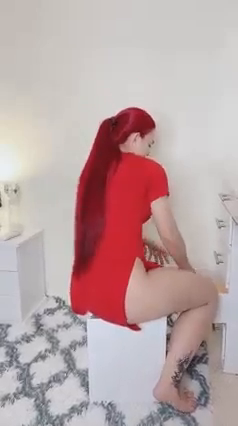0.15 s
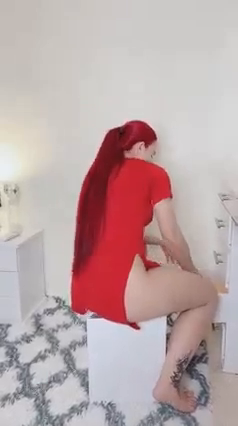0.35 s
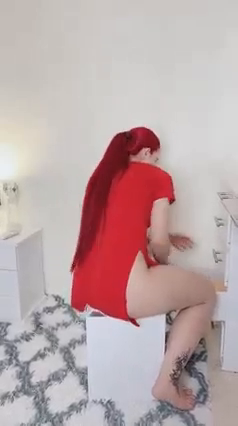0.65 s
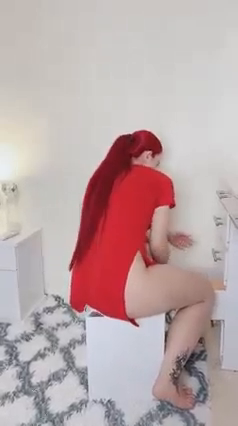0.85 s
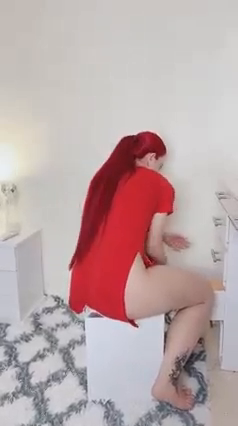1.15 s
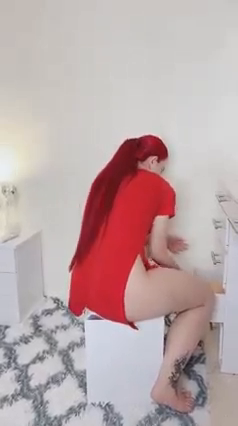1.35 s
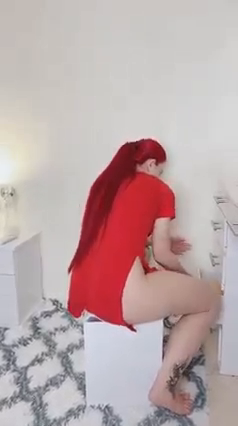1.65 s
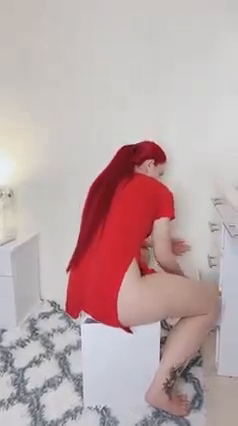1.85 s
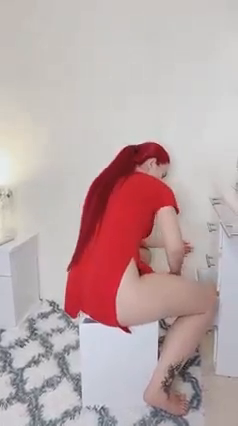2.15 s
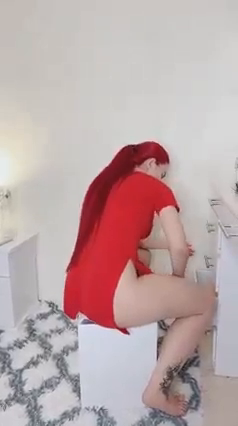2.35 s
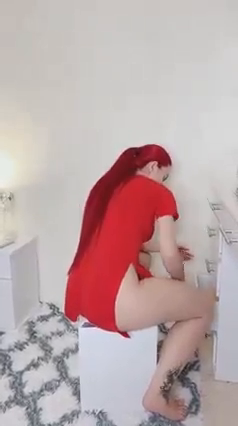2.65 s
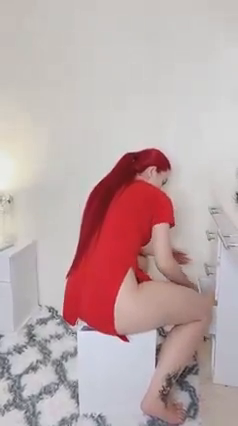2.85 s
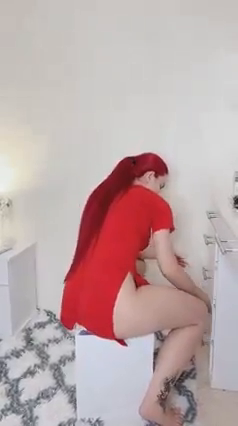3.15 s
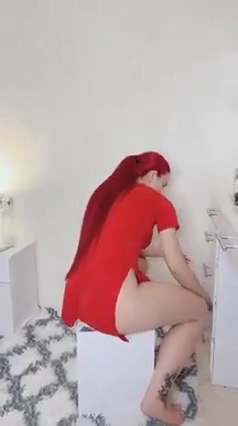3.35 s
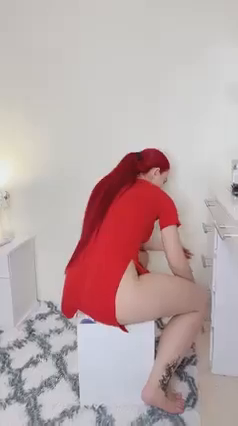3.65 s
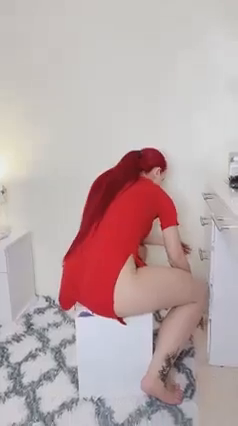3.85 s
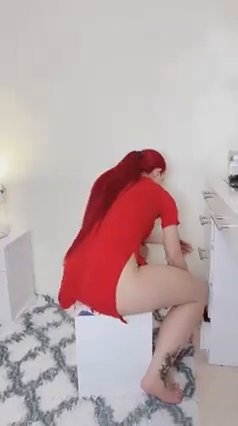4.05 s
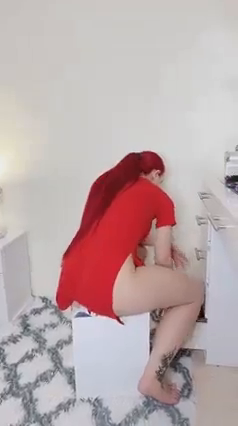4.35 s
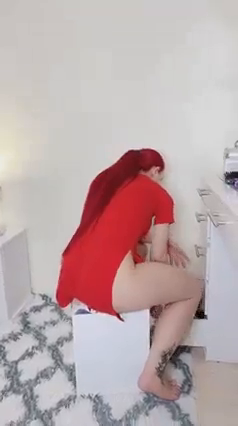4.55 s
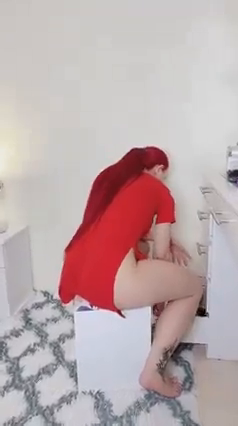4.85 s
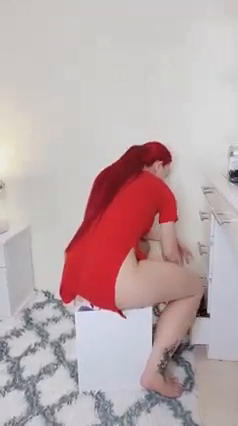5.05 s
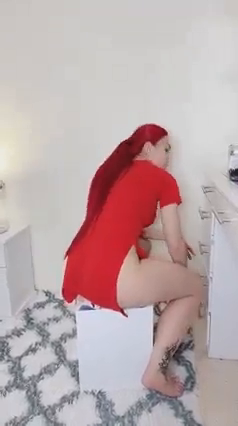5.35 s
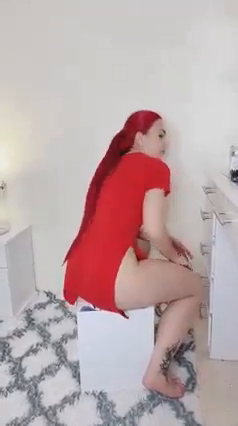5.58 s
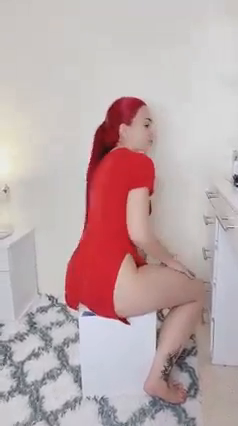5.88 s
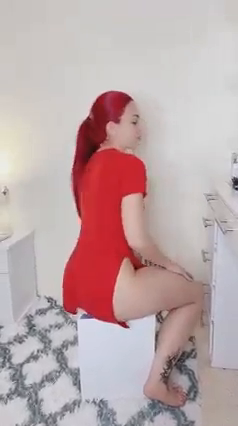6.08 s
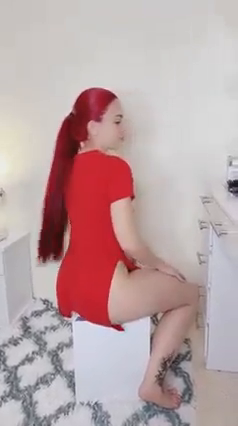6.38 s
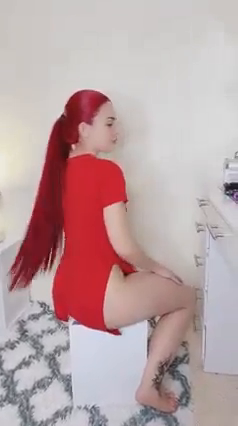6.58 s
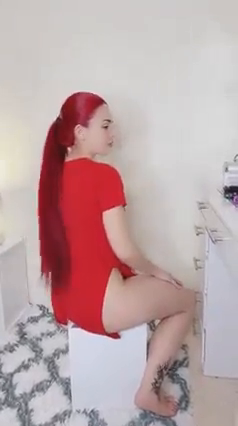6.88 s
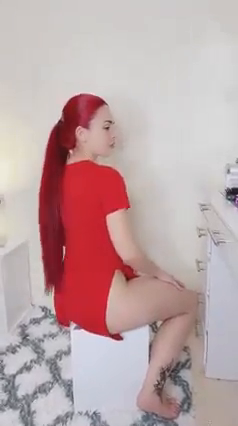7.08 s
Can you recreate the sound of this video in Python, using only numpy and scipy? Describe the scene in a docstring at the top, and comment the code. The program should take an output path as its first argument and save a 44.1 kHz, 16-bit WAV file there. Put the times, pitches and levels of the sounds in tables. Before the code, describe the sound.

In a quiet, small bedroom, a chipboard dresser's drawers are worked by hand. Light knocks and a rumble lead to a heavy, boomy bang, then more clunks. After a pause come further groups of double and triple knocks with short runner hiss, ending in a sharp, loud slam and a few small clicks. Faint hum and rustling clothes fill the gaps. The microphone is a little way off, in stereo.

```python
"""Drawers of a chipboard dresser knock as they are pulled out and pushed shut in a quiet bedroom.
Each knock sums decaying carcass and drawer-box modes with bands of decaying noise for the panels and the
room's brief answer, and rebounds twice; harder knocks ring longer, and loose parts ring as buzzing tones.
Filtered noise makes the runners hiss and the drawers rumble; stick-slip pulses creak, gliding tones squeak.
Clothes rustle over still air, a faint hum and a thin whine."""
import sys
import numpy as np
from scipy import signal
from scipy.fft import rfft, irfft, next_fast_len
from scipy.io import wavfile

SR = 44100
rng = np.random.default_rng(int(sys.argv[2]) if len(sys.argv) > 2 else 0)


def int16_out(signal):
    """Quantize to a 16-bit WAV file."""
    q = np.round(np.clip(np.atleast_2d(signal).T, -1, 1) * 32767)
    wavfile.write(sys.argv[1], SR, q.astype(np.int16))


N = 318327

# Stereo coherence of the sources. Each row: frequency in Hz, left-right likeness (1 is identical).
LIKENESS = [(160, 1), (220, 1), (370, 0.99), (700, 0.55), (1050, 0.38), (1700, 1), (2800, 0.46),
            (4400, 0.48), (7000, 0.41), (10000, 0.97)]


def gain_of(db):
    """Amplitude is ten to the power of the level in decibels over twenty."""
    return 10 ** (np.asarray(db) / 20)


def evened(x):
    """Dividing by the root mean square gives a signal unit power."""
    return x / np.sqrt(np.mean(x ** 2) + 1e-20)


def read(points, hz):
    """Spectra are interpolated along a logarithmic frequency axis, near to how pitch is heard."""
    f, value = np.transpose(points)
    return np.interp(np.log(hz + 1), np.log(f + 1), value)


def add(mix, s, sound):
    """Superposition: a sound starting at s seconds adds to the mix."""
    part = mix[:, round(s * SR):][:, :sound.shape[-1]]
    part += sound[..., :part.shape[1]]


def ports(pair, hz, likeness=LIKENESS):
    """Coherence: two unrelated signals, weighted as mid and side, give left and right of set likeness."""
    same = np.clip(read(likeness, hz), -1, 1)
    mid = pair[0] * np.sqrt((1 + same) / 2)
    side = pair[1] * np.sqrt((1 - same) / 2)
    return np.array([mid + side, mid - side])


def noise(spectrum, grain_db=0, likeness=LIKENESS):
    """Friction as countless tiny impacts: white noise of uneven grain, coloured by a spectrum, at unit rms."""
    size = next_fast_len(N, True)
    hz = np.fft.rfftfreq(size, 1 / SR)
    white = rng.standard_normal((2, size))
    grain = np.repeat(rng.standard_normal(size // 32 + 1), 32)[:size]
    impacts = rfft(white * gain_of(grain_db * grain))
    coloured = ports(impacts, hz, likeness) * gain_of(read(spectrum, hz))
    return evened(irfft(coloured, size)[:, :N])


def knocks(count=2):
    """Impact and restitution: drawers strike stops, fronts and rails, and rebound at shrinking gaps."""
    # Each row: start in seconds, carcass thud, large panels, small panels and clack in dB (trimmed in blow),
    # treble slope in dB per octave, rebound level in dB relative to the blow,
    # ring time factor (under 1 where a hand damps the wood).
    blows = [(0.442, -43, -38, -38.5, -56, -0.5, -9, 1), (0.47, -54, -34, -32, -41, -20, 3, 1),
             (0.482, -55, -42, -38, -50, -4.5, -12, .8), (0.509, -52, -30, -31, -42, -6, -11, .9),
             (0.573, -42, -31, -32, -43.5, -11, -14, 1), (0.614, -48, -40, -40, -49, -10, -14, .8),
             (0.896, -49.5, -55, -54, -58, 4.5, -5, 1), (1.025, -50, -38, -40, -52.5, -5, -2.5, 1),
             (1.073, -32.5, -39, -43, -46.5, -6, -11, 1), (1.141, -27, -25.5, -31, -47.5, -5.5, -23, .9),
             (1.175, -36, -39, -40, -41.5, -8, -16, .7), (1.202, -36, -34, -37, -48, -6, -8, .9),
             (1.327, -38, -24, -21.5, -39, -7.5, -17, 1), (1.344, -40, -23, -18, -34.5, -6.5, -13, 1),
             (1.36, -11.5, -18, -15.5, -27, -1.5, -8, .9), (1.54, -31, -25, -22.5, -33, -3, -16, 1),
             (1.563, -37, -25, -24, -31.5, -7.5, -9, 1), (1.593, -38, -23, -23, -38.5, -9, -9.5, .9),
             (1.675, -39, -48, -46, -43, -6.5, -4, 1), (1.826, -50, -60, -60, -65, 0, -8, 1),
             (2.71, -49, -40, -40, -54, -6, -6, 1), (2.741, -31, -22, -21.5, -39, -6.5, -15, 1),
             (2.76, -36, -24, -24, -43, -9.5, -20, .9), (2.779, -42, -32, -32, -45, -10, -18, .8),
             (2.85, -25, -24, -25.5, -35.5, -8.5, -14.5, 1.05), (2.882, -29, -29, -33, -45, -8, -27, 1),
             (3.104, -21, -18, -17.5, -37, -4.2, -18, 1), (3.138, -33, -29, -28, -52, -6, -18, .9),
             (3.189, -43, -44, -44, -54, -6, -9, 1), (3.227, -44, -36, -35, -46.5, -12, -14, .7),
             (3.252, -30.5, -32.5, -31, -43.5, -8, -15, .9), (3.974, -30, -33.5, -33.5, -46, -9, -12, 1),
             (3.983, -39, -32, -31, -41.5, -14, -1, 1), (4.04, -60, -29, -26, -34.5, -9.5, -14, 1),
             (4.053, -27, -26, -24, -31, -8.5, -8, 1), (4.096, -32, -38, -31, -41, -9, -14, 1),
             (4.337, -42, -30, -30, -40.5, -4.5, -10.5, .9), (4.383, -39, -35, -39, -50, -7, -20, .8),
             (4.879, -35, -22.5, -19.5, -32, -9.5, -20, .9), (4.908, -30, -23.5, -24, -43, -7.5, -14, .9),
             (4.942, -52, -33, -31, -41.5, -16, -8, .9), (4.968, -48, -38, -30, -45, -12, -14, 1),
             (5.169, -26, -22.5, -21.5, -39.5, -7, -26, 1), (5.198, -17.5, -11.5, -10, -18, -2.7, -8, 1.03),
             (5.229, -30, -30, -29, -29, -3.5, -9, 1.1), (5.494, -36, -30, -29, -38, -6, -13, .8),
             (5.512, -31, -33.5, -32, -50, -4, -14.5, .45), (5.543, -50, -35, -31, -53, -8, -26, .5)]
    first_gap_s, gap_shrink, gap_scatter, loss_db = .03, .85, .12, -7.5  # loss from one rebound to the next
    hard_db, ring_gain_per_db, rebound_ring = -15.5, .011, 0.32  # blows below hard_db ring for less time
    glance_thud_db, glance_clack_db, glance_slope_db = -12, -4.5, -2  # rebounds lack bass and treble

    out = np.zeros((2, N))
    scatter = np.exp(gap_scatter * rng.uniform(-1, 1, (len(blows), count)))
    gaps = first_gap_s * gap_shrink ** np.arange(count) * scatter
    for row, delays in zip(blows, np.cumsum(gaps, axis=1)):
        s, low_db, large_db, panel_db, clack_db, slope_db, rebound_db, freedom = row
        ring = freedom * np.exp(ring_gain_per_db * (max(low_db, panel_db) - hard_db))
        add(out, s, blow(low_db, large_db, panel_db, clack_db, slope_db, ring, size=20480))
        glance = blow(low_db + glance_thud_db, large_db, panel_db, clack_db + glance_clack_db,
                      slope_db + glance_slope_db, ring * rebound_ring, size=8192)
        for k, delay in enumerate(delays):
            add(out, s + delay, gain_of(rebound_db + k * loss_db) * glance)
    return out


def blow(low_db, large_db, panel_db, clack_db, slope_db, ring, size, thud_db=-1, clatter_db=-1, box_db=-2):
    """Modal excitation: the spectrum of one contact sets how strongly panels and box ring above the thud."""
    t = np.arange(size) / SR
    treble_hz, octaves = 1050, 2.5  # the treble slopes from here, over this span
    treble_db = clack_db + slope_db * octaves
    force = [(190, large_db), (373, panel_db), (650, clack_db), (treble_hz, clack_db),
             (treble_hz * 2 ** octaves, treble_db)]  # (Hz, dB)
    boom = gain_of(low_db + thud_db) * thud(ring, t)
    rattle = gain_of(clatter_db) * clatter(force, ring, t)
    box = gain_of(box_db) * drawer_box(force, ring, t)
    release = np.minimum(np.linspace(10, 0, size), 1)  # fades the last tenth
    return release * (boom + rattle + box)


def thud(ring, t, rise=.011, seconds=0.027):
    """Low-frequency resonance: the carcass modes swell as the blow spreads, then decay exponentially."""
    # Low modes of the carcass. Each row: frequency in Hz, level in dB, 60 dB decay time in s before ring.
    carcass = [(58, -20, 0.35), (102.86, -1, 0.45), (97.6, -19, 0.49), (139.5, -5.5, 0.23),
               (204.35, -7, 0.55), (306.2, -16.5, .3)]
    detune = 1 + 0.0044 * rng.standard_normal()
    modes = sum(gain_of(db - 60 * t / (t60 * ring)) * np.sin(2 * np.pi * hz * detune * t)
                for hz, db, t60 in carcass)
    boom = modes * (1 - np.exp(-(t / rise) ** 2))
    return boom / np.sqrt(np.mean(boom[t < seconds] ** 2))  # unit rms over the attack


def clatter(force, ring, t, rise_cycles=1.0, touch_s=0.0026, contact=0.66, contact_s=0.016, grain_db=2):
    """High modal density: panel modes merge into noise bands that die into the longer room tail."""
    # Panel bands. Each row: centre in Hz, level in dB, 60 dB decay time in s before ring,
    # room level in dB relative to the band, room 60 dB decay time in s.
    panels = [(137, -10.5, 0.2, -12.5, 0.64), (218, -8, 0.31, -13.5, 0.66), (336, -9.5, 0.25, -6, 0.47),
              (483, -13, 0.12, -1.5, 0.38), (784, -6.5, 0.17, -6.5, 0.43), (1050, -10.5, 0.21, -10, .42),
              (1610, -7, 0.088, -4.5, 0.35), (3178, -4, 0.12, -6.5, 0.34), (4800, -7, 0.14, -8, .36),
              (6200, -2.5, 0.09, -6.5, 0.3), (8000, -10, 0.08, -9, 0.3), (9300, -18, 0.045, -18, 0.13)]
    # Lean of the knocks to one side. Each row: frequency in Hz, left minus right in dB.
    lean = [(190, 0), (340, -1.5), (620, -2.5), (1110, 2.5), (1980, -0.5), (3550, 0.6)]

    hz = np.fft.rfftfreq(len(t), 1 / SR)
    centres = np.array([row[0] for row in panels])
    edges = np.r_[centres[0] / 2, centres, centres[-1] * 1.35]
    chatter = gain_of(grain_db * np.repeat(rng.standard_normal(len(t) // 32), 32))
    taps = ports(rfft(rng.standard_normal((2, len(t))) * chatter), hz)
    taps = taps * gain_of(read(lean, hz) * np.array([[.5], [-.5]]))
    age = np.log(1000) * t  # 60 dB of decay after one t60
    hardness = 1 + contact * np.exp(-t / contact_s)
    out = np.zeros((2, len(t)))
    for (centre, db, t60, room_db, room_t60), lo, hi in zip(panels, edges, edges[2:]):
        wood, room = np.exp(-age / (t60 * ring)), gain_of(room_db) * np.exp(-age / room_t60)
        decay = np.hypot(wood, room)
        swell = 1 - np.exp(-(t / (touch_s + rise_cycles / centre)) ** 2)  # low modes take longer to build
        band = irfft(taps * np.interp(hz, [lo, centre, hi], [0, 1, 0])) * decay * swell * hardness
        attack = band[:, t < .014 + 7 / centre]
        out += gain_of(db + read(force, centre)) * band / np.sqrt(np.mean(attack ** 2))
    return out


def drawer_box(force, ring, t):
    """Discrete resonance: each box mode takes its strength from the blow's spectrum at its own pitch."""
    # Outstanding modes of the box. Each row: frequency in Hz, level in dB, 60 dB decay time in s before ring.
    box_modes = [(339, -13.5, 0.4), (460, -16, 0.099), (592, -9.5, 0.37), (636, -15.5, 0.3),
                 (710, -12.5, 0.17), (948, -21.5, 0.28), (1049, -17.5, 0.14), (1222, -17, 0.36),
                 (1280, -20.5, 0.27), (2130, -16, 0.25), (2490, -23.5, 0.16), (2450, -18, 0.12),
                 (6455, -21.5, .23)]
    # where a blow lands and how far the drawer is out change each mode a little
    scatter_db, detune = 1.5, 0.0058  # greatest change in level, and in pitch as a fraction
    out = np.zeros((2, len(t)))
    for hz, db, t60 in box_modes:
        phases = np.exp(2j * np.pi * rng.random((2, 1)))
        luck, shift = rng.uniform(-1, 1, 2)
        tone = (ports(phases, hz) * np.exp(2j * np.pi * hz * (1 + detune * shift) * t)).imag
        level_db = db + scatter_db * luck + read(force, hz)
        out += np.sqrt(2) * gain_of(level_db - 60 * t / (t60 * ring)) * tone
    return out * (1 - np.exp(-t / 0.0026))


def ringing_parts(width_hz=60, rise_cycles=0.96):
    """Random modulation: loose parts ring and buzz at their joints, which blurs the higher tones most."""
    # Each row: start in seconds, part, level in dB, pitch factor, rattle from 0 to 1.
    rings = [(0.478, "thin panel", -30.5, 1.28, .36), (0.493, "handle", -50.5, 1.12, .4),
             (0.577, "back panel", -30, 1.2, .3), (0.896, "handle", -54.5, 1.05, 0.7),
             (0.9, "thin panel", -54.5, 1.01, .3), (1.2, "dry runner", -43.5, 1.02, 0.7),
             (2.156, "dry runner", -60, .97, .9), (1.362, "handle", -47.5, 1.24, 0.6),
             (1.366, "back panel", -17.5, 1.025, 0.1), (1.356, "thin panel", -24, 1, .5),
             (1.372, "side wall", -22, 1, .1), (1.546, "drawer bottom", -29, .88, 0.6),
             (1.594, "drawer bottom", -32, .92, 0.9), (1.826, "handle pivot", -55.5, 1.01, 0.7),
             (2.754, "back panel", -25, 1.03, 0.2), (2.856, "back panel", -22.5, 1.07, 0.4),
             (3.107, "thin panel", -26.5, 0.95, .36), (3.106, "frame", -34, 0.95, .36),
             (3.116, "back panel", -26, 0.75, 0.2), (4.048, "drawer bottom", -25, 0.98, .36),
             (4.339, "runner stop", -27, 1.036, .45), (4.883, "thin panel", -21.5, 1.01, .36),
             (4.881, "dry runner", -41, .98, .4), (5.215, "side wall", -24, 1, .1),
             (5.203, "frame", -25.5, 1.05, .36), (5.202, "drawer bottom", -19, 1.02, .36),
             (5.201, "handle", -41, 1.04, .9), (5.493, "loose fitting", -41.5, 1.01, .25),
             (5.527, "loose fitting", -45.5, 0.99, 0.1)]
    # Modes of each part. Each row: frequency in Hz before the pitch factor, level in dB, 60 dB decay time in s.
    parts = {"frame": [(53.6, -0.5, 0.49)], "side wall": [(102.5, 0, .85), (204, -5, .7)],
             "dry runner": [(590, -7, .07), (1210, 0, .11), (1580, -1, .06)],
             "back panel": [(140.4, 2, 0.18)], "thin panel": [(311.5, 1.5, .38)],
             "drawer bottom": [(463, -2.5, 0.22), (576, -3.5, 0.19), (643, 0.5, 0.17), (703, -4, 0.18),
             (892, -5, 0.13), (1075, -13, 0.089)], "runner stop": [(300, -9, .15), (585, -11, .13),
             (643, -0.5, 0.21), (684, -11, .14), (1240, -20, 0.13), (1900, -23, 0.11), (7700, -24.5, 0.13)],
             "handle": [(1330, -9.5, 0.38), (2225, 2.5, 0.2), (2280, -10.5, .24), (5100, -6, 0.16),
             (6115, -9, .23), (6760, -2, 0.26), (7150, -4, .25), (7200, -0.5, 0.28)],
             "handle pivot": [(2180, -6, 0.21), (3280, -1, 0.16)], "loose fitting": [(1265, 4.5, 0.093),
             (1390, -3, 0.13), (1750, -10, 0.11), (1900, -6.5, 0.15), (2114, -1.5, 0.23), (2654, -10, 0.14),
             (2850, -12, 0.11)]}
    out, t = np.zeros((2, N)), np.arange(SR // 2) / SR
    for s, part, part_db, pitch, rattle in rings:
        for mode_hz, db, t60 in parts[part]:
            hz = mode_hz * pitch
            pole = np.exp(-np.pi * width_hz * (hz / 2000) / SR)  # buzz is faster at higher pitch
            white = rng.standard_normal((2, 2, len(t)))
            buzz = evened(signal.lfilter([1], [1, -2 * pole, pole ** 2], white))
            blur = rattle * hz / (hz + 1000)
            swing = (1 + blur * (buzz[0] + 1j * buzz[1])) / np.sqrt(1 + 2 * blur ** 2)
            onset = 1 - np.exp(-t * hz / rise_cycles)
            tone = (swing * np.exp(2j * np.pi * hz * t)).imag * onset
            add(out, s, np.sqrt(2) * gain_of(part_db + db - 60 * t / t60) * tone)
    return out


def slides(judder_db=2.4, judder_hz=35):
    """Sliding friction: the runners hiss, and their bumps shake a drawer box that catches and slips."""
    # Strokes. Each row: start in seconds, end of the push in seconds, hiss in dB, rumble in dB before a 7 dB cut.
    strokes = [(0.46, 0.498, -41.5, -38.5), (0.57, 0.59, -57, -20), (1.05, 1.373, -51.5, -39),
               (1.553, 1.583, -39, -15.5), (2.66, 3.194, -52, -43.5), (3.917, 4.373, -52.5, -46.5),
               (4.41, 4.58, -54.5, -40.5), (4.763, 5.18, -49, -37.5)]
    # Colour of the runner hiss. Each row: frequency in Hz, density in dB per Hz.
    runner = [(350, -51), (600, 2), (759, -7), (1200, -4.5), (1460, -10), (2360, -10), (2640, -11.5),
              (5350, -13.5), (7740, -8.5), (9790, -23), (11100, -55.5), (11500, -54.5), (15000, -70),
              (22000, -120)]
    # Colour of the drawer's rumble. Each row: frequency in Hz, density in dB per Hz.
    rumble = [(40, -16.5), (75, -31), (105, 3.5), (170, -1.5), (280, -0.5), (400, -6.5), (600, -16.5),
              (1100, -31.5), (3000, -87.5)]
    hiss_fall, rumble_fall = 162, 189.5  # dB per s, as the drawer comes to rest

    beats = np.arange(0, N / SR + 1, 1 / judder_hz)
    judder = np.interp(np.arange(N) / SR, beats, rng.standard_normal(len(beats)))
    hiss = sum(gain_of(db) * stroke(start, end, hiss_fall) for start, end, db, _ in strokes)
    shake = sum(gain_of(db) * stroke(start, end, rumble_fall) for start, end, _, db in strokes)
    hiss = hiss * gain_of(0.99 * judder_db * judder)
    shake = shake * gain_of(judder_db * judder - 7)
    return hiss * noise(runner, grain_db=2) + shake * noise(rumble, grain_db=2.5)


def stroke(start, end, fall_db_per_s):
    """Friction follows speed: the drawer gathers way, holds while pushed, then dies away exponentially."""
    t = np.arange(N) / SR
    speed_up_s = 0.33 * (end - start)
    gather = np.clip((t - start) / speed_up_s, 0, 1) ** 1.15  # a power above 1 starts gently
    return gather * gain_of(-fall_db_per_s * np.maximum(t - end, 0))


def creaks(uneven=0.69, slip_db=4, count=40, slips_per_s=69):
    """Stick-slip: dry wood slips at uneven intervals, and each slip rings the runner briefly."""
    # Each row: start in seconds, length in seconds, level in dB.
    creak_times = [(0.454, 0.095, -53), (1.14, 0.13, -56), (2.741, 0.059, -53), (4.43, 0.17, -62)]
    # Resonances of the runner. Each row: frequency in Hz, level in dB, 60 dB decay time in seconds.
    creak_modes = [(650, -1, .05), (875, -11, .04), (1185, 3, 0.08), (1624, -2.5, .05), (2570, -2, 0.049)]
    out, t = np.zeros((2, N)), np.arange(4096) / SR
    onset = 1 - np.exp(-t / 0.0011)
    for start, length, level_db in creak_times:
        times = np.cumsum(np.exp(uneven * rng.standard_normal(count))) / slips_per_s
        sizes = gain_of(level_db + slip_db * rng.standard_normal(count))
        phases = np.exp(2j * np.pi * rng.random((count, len(creak_modes), 2, 1)))
        for s, size, turns in zip(times[times < length], sizes, phases):
            slip = sum(gain_of(db - 60 * t / t60) * (ports(turn, hz) * np.exp(2j * np.pi * hz * t)).imag
                       for (hz, db, t60), turn in zip(creak_modes, turns))
            swell = np.sin(np.pi * s / length)  # strongest midway through the creak
            add(out, start + s, size * swell * slip * onset)
    return out


def squeaks(width_hz=90, rise_power=.6, flutter_db=3.5):
    """Friction-driven vibration: a drawer eased by hand squeaks in blurred tones that flutter as it catches."""
    # Each row: start, swell and fade in seconds, pitch in Hz, glide in Hz per second, level in dB,
    # upper tones in dB.
    squeak_rows = [(2.178, .065, .065, 1200, 0, -58, 0), (4.645, .045, .12, 1535, 550, -68.5, -14)]
    # Each row: multiple of the squeak's pitch, level in dB.
    tones = [(1, 0), (1.31, -4), (1.68, -18), (2.41, -19), (2.72, -15)]
    out, t = np.zeros((2, N)), np.arange(SR // 2) / SR
    pole = np.exp(-np.pi * width_hz / SR)
    catches = np.arange(0, .5, .011)  # seconds
    for start, swell_s, fade_s, hz, glide, level_db, upper_db in squeak_rows:
        pressure = np.minimum(t / swell_s, 1) ** rise_power * np.exp(-np.maximum(t - swell_s, 0) / fade_s)
        flutter = gain_of(flutter_db * np.interp(t, catches, rng.uniform(-1, 1, len(catches))))
        turns = hz * t + glide * t ** 2 / 2
        for multiple, db in tones:
            white = rng.standard_normal((2, 2, len(t)))
            a, b = evened(signal.lfilter([1], [1, -2 * pole, pole ** 2], white))
            tone = (ports(a + 1j * b, hz * multiple) * np.exp(2j * np.pi * multiple * turns)).imag
            add(out, start, gain_of(level_db + db + upper_db * (multiple > 1)) * pressure * flutter * tone)
    return out


def woody(x, depth_db=2.5, spacing_hz=65, above_hz=800, count=400, size=8192):
    """Minimum-phase filtering: many weak board resonances ripple the mids and treble of all it is given."""
    hz = abs(np.fft.fftfreq(size, 1 / SR))
    ripple = np.interp(hz, spacing_hz * np.arange(count), rng.standard_normal(count))
    log_gain = np.log(gain_of(depth_db * ripple * hz ** 2 / (hz ** 2 + above_hz ** 2)))
    spectrum = np.exp(np.conj(signal.hilbert(log_gain)))  # phase follows from the log gain
    response = np.fft.ifft(spectrum).real[:size // 2]
    return signal.oaconvolve(x, response[None] / np.linalg.norm(response))[:, :N]


def background():
    """Stationary and swelling noise: still air, a sinusoidal hum, a narrow-band whine and brushing cloth."""
    # Clothes and hair brush with body movements. Each row: middle and half length in seconds, level in dB.
    rustles = [(0.056, 0.42, -69), (1.995, 0.3, -66.5), (2.603, 0.13, -72), (3.401, 0.33, -74.5),
               (5.598, 0.17, -69.5), (6.45, 0.21, -71)]
    # Colour of the still air. Each row: frequency in Hz, density in dB per Hz.
    air_colour = [(15, -33.5), (25, -16), (43, -2), (102, -4), (163, -10), (272, -8.5), (389, -12.5),
                  (420, -9), (454, -21), (490, -16), (1060, -24.5), (2470, -34.5), (3110, -34.5),
                  (7630, -36.5), (11500, -63), (15000, -70), (22000, -120)]
    # Diffuse air differs more between the sides. Each row: frequency in Hz, left-right likeness.
    air_likeness = [(50, 1), (100, 1), (155, .93), (220, .88), (370, -0.16), (700, -0.0076), (1050, -.25),
                    (1650, 0.42), (2800, 0.68), (4400, 0.44), (7000, 0.15), (11000, .6)]
    cloth_colour = [(200, -25.5), (900, -2.5), (2300, 0), (3500, -8), (7200, -2.0), (8500, -8.0),
                    (10500, -25.0), (14000, -59.5)]  # (Hz, dB per Hz)
    whine_colour = [(2200, -60), (2370, -8), (2470, 0), (2580, -8), (2750, -60)]  # (Hz, dB per Hz)
    air_db, hum_db, whine_db = -58.5, -66, -81.5
    hum_hz = 102.3

    t = np.arange(N) / SR
    brushing = sum(gain_of(db) / np.hypot(1, ((t - middle) / half) ** 2) for middle, half, db in rustles)
    cloth = brushing * noise(cloth_colour, grain_db=1.5, likeness=air_likeness)
    hum = np.sqrt(2) * gain_of(hum_db) * np.sin(2 * np.pi * hum_hz * t)
    whine = gain_of(whine_db) * noise(whine_colour)
    lean = gain_of(-1.3 * np.array([[.5], [-.5]]))  # the air is a little louder on the right
    air = lean * gain_of(air_db) * noise(air_colour, likeness=air_likeness)
    return air + hum + whine + cloth


def scene():
    """Superposition: the dresser's sounds add to those of its room."""
    return woody(knocks() + slides()) + ringing_parts() + creaks() + squeaks() + background()


def record(dry, edge_hz=11700):
    """Soft saturation rounds the peaks near full scale; a low-pass filter then limits the band."""
    rounded = dry / (1 + dry ** 8) ** (1 / 8)
    low_pass = signal.firwin(255, edge_hz, window=("kaiser", 9), fs=SR)
    return signal.oaconvolve(rounded, low_pass[None], "same")


dry = scene()
out = record(dry)
int16_out(out)
```